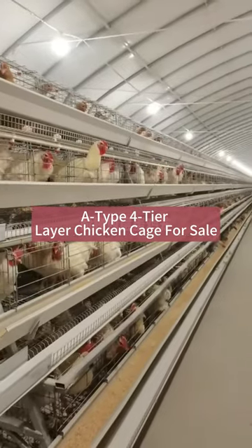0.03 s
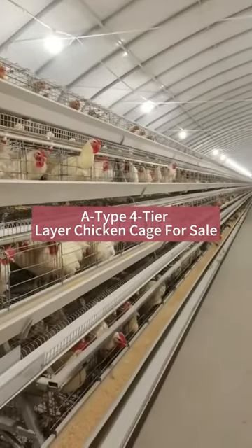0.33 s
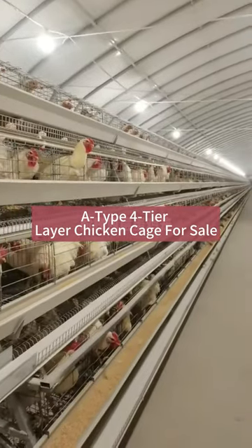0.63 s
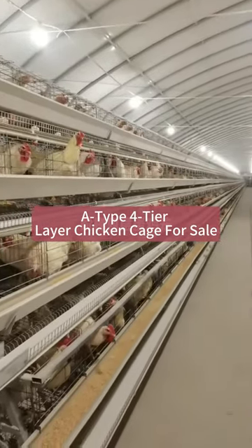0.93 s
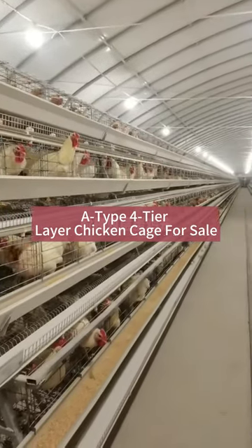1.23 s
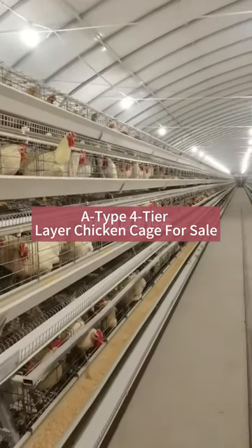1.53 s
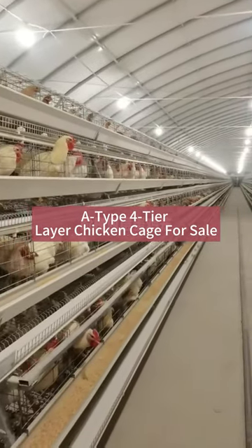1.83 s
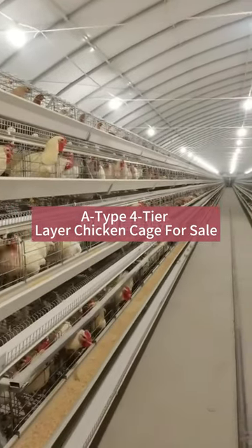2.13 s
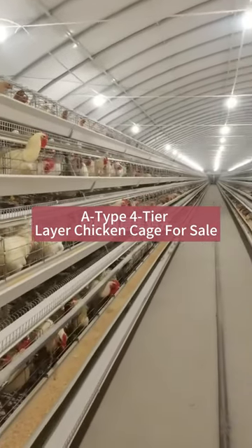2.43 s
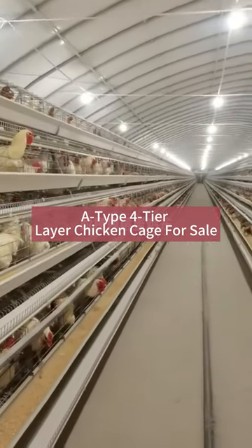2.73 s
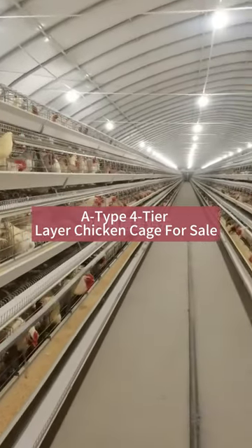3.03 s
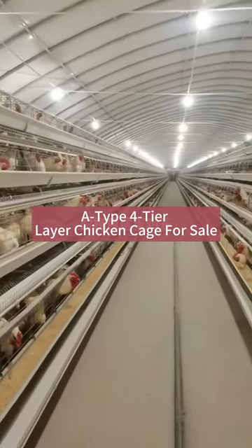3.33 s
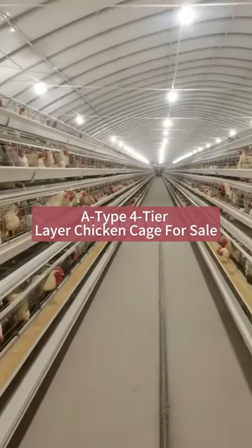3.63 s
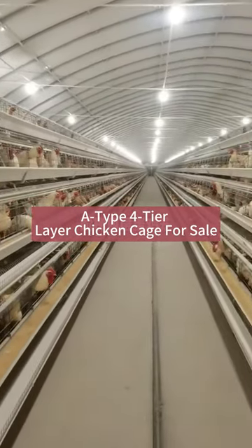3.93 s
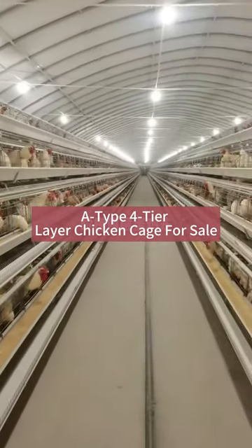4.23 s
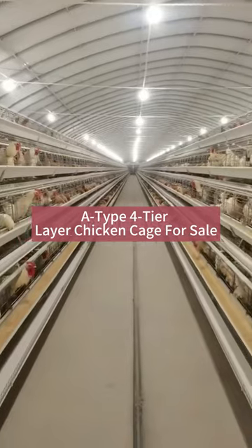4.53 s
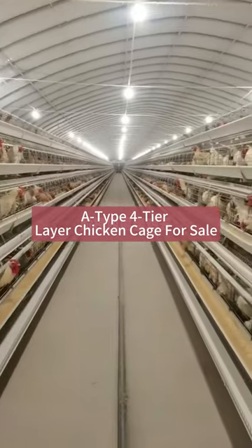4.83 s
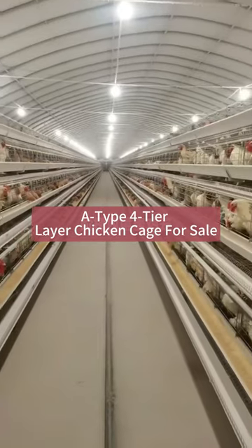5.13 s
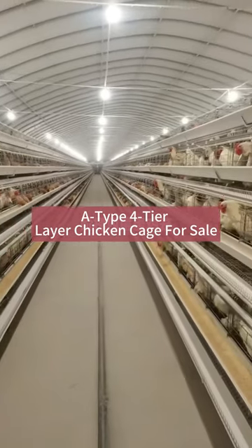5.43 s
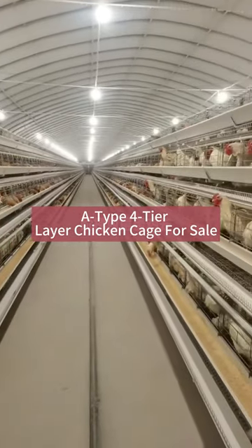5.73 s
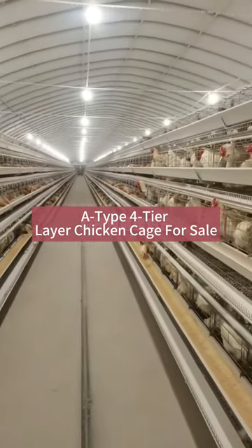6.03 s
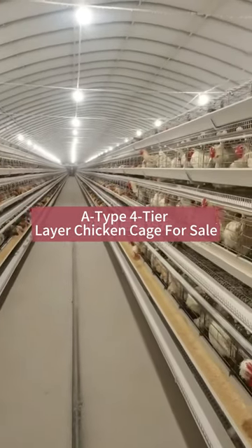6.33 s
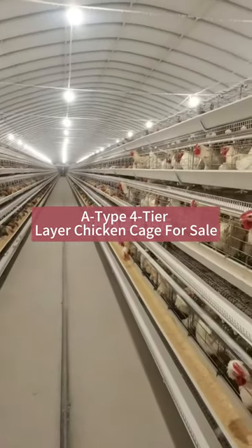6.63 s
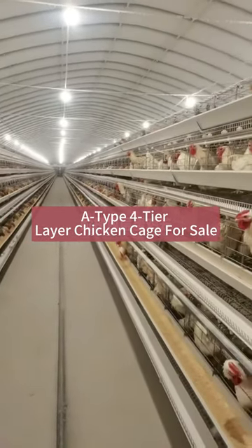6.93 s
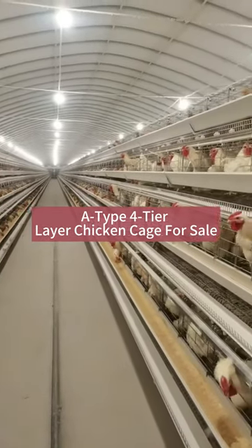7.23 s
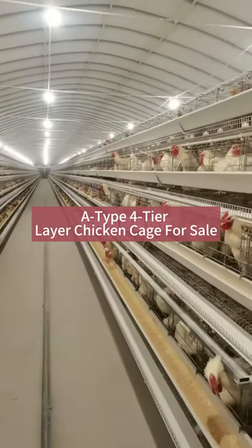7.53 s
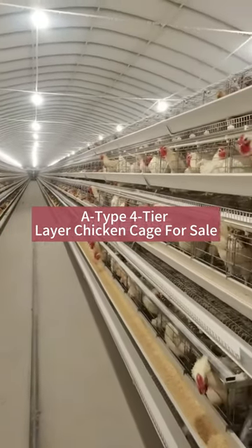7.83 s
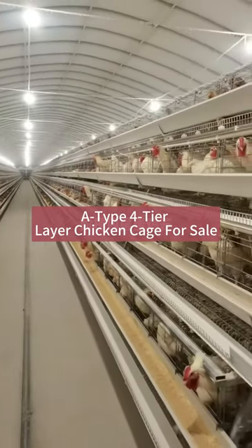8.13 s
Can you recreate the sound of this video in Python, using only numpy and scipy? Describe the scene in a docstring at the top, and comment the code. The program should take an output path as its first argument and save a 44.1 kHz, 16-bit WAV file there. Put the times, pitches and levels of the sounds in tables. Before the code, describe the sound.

Ventilation fans hum and rush in a large poultry house while hens cluck and peck faintly, with a brief dropout midway.

```python
"""Inside a long arched poultry house: big ventilation fans hum and push a steady rush of air down the aisle.
The hum is blade-passing tones and thin motor whines. Caged hens tap their beaks on wire and troughs,
and cluck, squawk and rasp under the roar: syrinx pulses and breath noise ring their throats,
blurred by the hall. The sound cuts out for just over half a second in the middle, then comes back."""
import sys
import numpy as np
from scipy import signal
from scipy.fft import rfft, irfft, next_fast_len
from scipy.io import wavfile
from scipy.ndimage import uniform_filter1d, map_coordinates

SR = 44100
rng = np.random.default_rng(int(sys.argv[2]) if len(sys.argv) > 2 else 0)


def int16_out(signal):
    """Quantize to a 16-bit WAV file."""
    q = np.round(np.clip(np.atleast_2d(signal).T, -1, 1) * 32767)
    wavfile.write(sys.argv[1], SR, q.astype(np.int16))


N = 369558


def amp(db):
    """Decibels to gain."""
    return 10 ** (np.asarray(db) / 20)


def unit(x):
    """Scale to rms 1."""
    return x / np.sqrt(np.mean(np.abs(x) ** 2) + 1e-20)


def over_frequency(rows, hz):
    """Interpolate (frequency [Hz], value) rows on a log axis."""
    row_hz, values = np.transpose(rows)
    return np.interp(np.log(hz + 1), np.log(row_hz + 1), values)


def over_time(rows):
    """Interpolate (time [s], value) rows to one value per sample."""
    return np.interp(np.arange(N) / SR, *np.transpose(rows))


def wobble(rate_hz, size=N):
    """Smooth random curve, rate_hz knots a second."""
    knots = rng.standard_normal(int(size * rate_hz / SR) + 4)
    return map_coordinates(knots, [np.arange(size) * rate_hz / SR])


def filtered(x, response):
    """Apply a frequency response by zero-padded FFT."""
    size = next_fast_len(len(x) + 8192)
    hz = np.fft.rfftfreq(size, 1 / SR)
    return irfft(rfft(x, size) * response(hz), size)[:len(x)]


def resonance(hz, centre_hz, width_hz):
    """Causal second-order band-pass response."""
    return 1j * hz * width_hz / (centre_hz ** 2 - hz ** 2 + 1j * hz * width_hz)


def add(track, start_s, sound):
    """Mix a sound into a track in place."""
    span = track[int(start_s * SR):][:len(sound)]
    span += sound[:len(span)]


def turbulence(spectrum, patchy_db):
    """Shaped noise of rms 1, with patches of random gain in time and frequency."""
    bins = signal.stft(rng.standard_normal(N), nperseg=512)[2]
    patches = uniform_filter1d(rng.standard_normal(bins.shape), size=5, axis=0)
    patches = uniform_filter1d(patches, size=12, axis=1)
    noise = signal.istft(bins * amp(patchy_db * unit(patches)), nperseg=512)[1][:N]
    return unit(filtered(noise, lambda hz: amp(over_frequency(spectrum, hz))))


# Fan roar: (frequency [Hz], relative density [dB])
ROAR_SPECTRUM = [(15, -10), (30, -10), (60, -11.5), (80, -2.5), (105, -4.5), (150, 1), (200, -1.5),
                 (280, -2), (340, -0.5), (430, -.5), (530, -3), (640, -8.5), (820, -16.5), (1300, -33.5),
                 (3000, -71.5)]
# Aisle hiss: (frequency [Hz], relative density [dB])
HISS_SPECTRUM = [(300, -25.5), (800, -4.5), (1200, 1), (1500, 0), (1850, -1), (2300, -5), (2900, -10.5),
                 (3800, -17), (5100, -17), (6300, -20), (7500, -27.5)]
# Hiss along the aisle: (time [s], level [dB])
HISS_LEVEL = [(0, -33), (3.6, -33), (5.2, -32), (6.4, -32.5), (7.1, -34), (8.38, -33.5)]


def airflow(roar_db=-26):
    """The fans' low roar, and the hiss of air and distant flock along the cages."""
    roar = amp(roar_db + 0.23 * wobble(4.8)) * turbulence(ROAR_SPECTRUM, patchy_db=1.0)
    hiss = amp(over_time(HISS_LEVEL) + 0.32 * wobble(12)) * turbulence(HISS_SPECTRUM, patchy_db=1.5)
    return roar + hiss


# Blade-rate harmonics 1, 2, 3 ...: (base level [dB], unsteadiness [0-1])
BLADE_HARMONICS = [(-49, 0.1), (-26.5, 0.06), (-31.5, 0.2), (-39, 0.96), (-38.5, 0.5), (-41.5, 0.99),
                   (-42, 0.4)]
# Swell of harmonic 2, the main drone, along the aisle: (time [s], gain [dB])
DRONE_SWELL = [(0, 0), (4.2, .3), (5.5, -.3), (6.4, 1.5), (7.1, .2), (8.38, 1)]
# Walk through standing waves, harmonic 5 traded against 4: (time [s], tilt [dB])
STANDING_WAVE_TILT = [(0, 4), (1.3, 4.5), (2.5, 2), (4.2, -5), (5.5, -2.5), (8.38, -0.5)]
# Motor whines: (frequency [Hz], base level [dB])
MOTOR_WHINES = [(634.4, -50.5), (3350, -68.5)]
# Late return of the hum after the cut-out: (time [s], gain [dB])
HUM_DIP = [(4.5, 0), (5.02, -8), (5.12, -5), (5.2, 0)]


def fan_hum(blade_hz=44.05):
    """Blade tones on one drifting shaft, each wavering with uneven inflow, plus motor whines."""
    t = np.arange(N) / SR
    blade_phase = 2 * np.pi * np.cumsum(blade_hz * (1 + .0012 * wobble(1.49))) / SR
    tilt_db = over_time(STANDING_WAVE_TILT)
    position_db = {2: over_time(DRONE_SWELL), 4: -tilt_db, 5: tilt_db}
    hum = np.zeros(N)
    for order, (db, unsteadiness) in enumerate(BLADE_HARMONICS, 1):
        waver = unit(1 + unsteadiness * (wobble(7) + 1j * wobble(7)) / np.sqrt(2))
        phase = order * blade_phase + 2 * np.pi * rng.random()
        hum += amp(db + position_db.get(order, 0)) * np.real(waver * np.exp(1j * phase))
    for hz, db in MOTOR_WHINES:
        hum += amp(db + 3.9 * wobble(3.7)) * np.sin(2 * np.pi * hz * t + wobble(6))
    return np.sqrt(2) * amp(over_time(HUM_DIP)) * hum


# Hall decay: (frequency [Hz], T60 [s])
HALL_T60 = [(200, 0.84), (1500, 0.47), (7000, 0.33)]


def hall_reverb(x):
    """The arched roof's reverberation, shorter in the treble."""
    hz, t, bins = signal.stft(rng.standard_normal(SR), SR, nperseg=256)
    decay = amp(-60 * t / over_frequency(HALL_T60, hz)[:, None])
    tail = signal.istft(bins * decay, SR, nperseg=256)[1]
    return signal.fftconvolve(x, tail / np.linalg.norm(tail))[:N]


# Beaks on cage wire and troughs: (time [s], level [dB], ring [Hz])
BEAK_TAPS = [(.44, -43.5, 4660), (0.864, -42, 3350), (1.915, -44.5, 4800), (2.075, -42.5, 4870),
             (2.345, -45.5, 4500), (2.855, -44.5, 4980), (3.13, -48, 5250)]


def pecks(t60_s=0.13, width_hz=600):
    """Each peck sets a short, noisy rattle ringing in the cage."""
    track = np.zeros(N)
    t = np.arange(SR // 8) / SR
    for start_s, db, ring_hz in BEAK_TAPS:
        rattle = unit(filtered(rng.standard_normal(len(t)), lambda hz: resonance(hz, ring_hz, width_hz)))
        add(track, start_s, amp(db - 60 * t / t60_s) * rattle)
    return track


def syrinx(pitch_hz, roughness):
    """Jittery pulses plus noise gated once a cycle; roughness is the noise's share of the power."""
    size = len(pitch_hz)
    cycles = np.cumsum(pitch_hz * (1 + .015 * wobble(120, size))) / SR
    pulses = np.diff(np.floor(cycles), prepend=0)
    rasp = rng.standard_normal(size) * (1 + np.cos(2 * np.pi * cycles))
    return np.sqrt(1 - roughness) * unit(pulses - pulses.mean()) + np.sqrt(roughness) * unit(rasp)


THROAT_HARMONIC, WAVER_OCT, CALL_EDGE_S = 3, .017, .007


def hen_call(length_s, pitch_hz, db, upper_hz, upper_db, upper_width_hz, roughness, width_hz, glide_oct=0):
    """The syrinx rings two throat resonances, which glide and waver with the pitch."""
    size = int(length_s * SR)
    progress = np.linspace(0, 1, size)
    voice = syrinx(np.full(2 * size, pitch_hz), roughness)

    def formant(centre_hz, band_hz):
        return unit(filtered(voice, lambda hz: resonance(hz, centre_hz, band_hz) ** 2))

    throat = amp(db) * formant(THROAT_HARMONIC * pitch_hz, width_hz)
    upper = amp(upper_db) * formant(upper_hz, upper_width_hz)
    speed = 2 ** (glide_oct * (progress - .5) + WAVER_OCT * wobble(35, size))
    call = map_coordinates(throat + upper, [np.cumsum(speed)])
    gate = signal.windows.tukey(size, 2 * CALL_EDGE_S / length_s)
    breath_db = 2.2 * wobble(70, size) - 1.2 * progress  # flutters, fades as the air runs out
    return call * unit(gate * amp(breath_db))


def calm_call(length_s, pitch_hz, db, roughness, width_hz=380, glide_oct=0):
    """A cluck or drawn-out note: a weak upper resonance lies an octave above the throat's."""
    return hen_call(length_s, pitch_hz, db,
                    upper_hz=2 * THROAT_HARMONIC * pitch_hz, upper_db=db - 21.5, upper_width_hz=310,
                    roughness=roughness, width_hz=width_hz, glide_oct=glide_oct)


def far_hens(count=45):
    """Faint falling clucks at random times and pitches."""
    track = np.zeros(N)
    for when, height, nearness in rng.random((count, 3)):
        cluck = calm_call(length_s=.042, pitch_hz=367 + 317 * height, db=-47 + 6 * nearness,
                          roughness=0.35, glide_oct=-.2)
        add(track, when * N / SR, cluck)
    return track


# Wide-open throat: (centre [Hz], width [Hz], relative gain [dB])
CRY_FORMANTS = [(1196, 390, 9), (2070, 380, 4), (2880, 670, -4), (4300, 900, -18), (5980, 2100, -27)]


def hoarse_cry(start_s=5.8, pitch_hz=412, base_db=-34.5, sag_db_per_s=4.5):
    """One long rasp through a wide-open throat, weakening as the hen's air runs out."""
    def throat(hz):
        return sum((-1) ** k * amp(db) * resonance(hz, centre_hz, width_hz)
                   for k, (centre_hz, width_hz, db) in enumerate(CRY_FORMANTS))

    t = np.arange(N) / SR - start_s
    attack_s, hold_s, release_s = .13, .74, .19
    breath = np.interp(t, np.cumsum([0, attack_s, hold_s, release_s]), [0, 1, 1, 0])
    voice = syrinx(pitch_hz * (1 + .02 * wobble(8)), roughness=0.94)
    return amp(base_db - sag_db_per_s * t) * breath * unit(filtered(voice, throat))


# Clucks: (time [s], length [s], pitch [Hz], level [dB], glide [oct])
NEAR_CLUCKS = [ (0.56, .04, 613, -35.5, .3), (1.159, .05, 575, -35.5, -.15), (1.298, .04, 445, -32, -0.22),
               (1.452, .035, 376, -36.5, -0.23), (1.738, 0.026, 392, -38, -.1),
               (1.826, .033, 645, -40, -0.12), (1.979, .033, 760, -39, .1), (2.013, .052, 615, -35, -.02),
               (2.165, .04, 625, -34, -0.31), (2.198, 0.028, 398, -34.5, -0.068),
               (2.453, 0.058, 410, -37, -0.013), (3.794, .07, 492, -34.5, 0.044),
               (5.288, .028, 635, -39, 0.037), (5.467, .036, 635, -36.5, -0.21), (5.582, .03, 452, -35, 0),
               (5.598, 0.04, 640, -35.5, -0.021), (5.713, 0.032, 655, -35.5, -0.13),
               (5.826, .07, 582, -33.5, 0.015), (5.956, .05, 680, -35.5, -.2),
               (6.17, 0.037, 650, -34.5, -.2), (6.486, .06, 545, -33.5, .08), (7.062, .026, 450, -36, -.15),
               (7.247, .028, 437, -35.5, -0.047), (7.333, .05, 478, -34.5, -0.3),
               (7.438, 0.024, 413, -33, 0.1), (7.51, 0.027, 393, -35.5, 0.052),
               (7.683, .022, 440, -31, 0.29), (7.78, .028, 520, -35.5, .1),
               (8.128, 0.041, 580, -34.5, 0.023), ]
# Drawn-out notes: (time [s], length [s], pitch [Hz], level [dB], throat width [Hz])
NEAR_DRAWLS = [(3.824, .37, 634, -35.5, 401), (5.99, .46, 411.5, -36, 221)]
# Squawks: (time [s], length [s], pitch [Hz], level [dB],
#           upper resonance [Hz], upper level [dB], upper width [Hz])
NEAR_SQUAWKS = [ (2.68, 0.071, 973, -45.5, 3550, -47, 450), (3.461, .067, 571, -39, 3150, -46.5, 650),
                (4.226, .082, 593.4, -31, 3520, -41, 290), (4.356, .042, 598, -27, 3320, -47.5, 500),
                (5.161, 0.086, 481, -42.5, 2900, -40.5, 600), (6.458, .04, 458, -34.5, 4000, -47.5, 400), ]


def near_hens():
    """Short clucks, breathy drawn-out notes and shrill squawks from the nearby cages."""
    track = np.zeros(N)
    for start_s, length_s, pitch_hz, db, glide_oct in NEAR_CLUCKS:
        add(track, start_s, calm_call(length_s, pitch_hz, db, roughness=.45, glide_oct=glide_oct))
    for start_s, length_s, pitch_hz, db, width_hz in NEAR_DRAWLS:
        add(track, start_s, calm_call(length_s, pitch_hz, db, roughness=.92, width_hz=width_hz))
    for start_s, *squawk in NEAR_SQUAWKS:
        add(track, start_s, hen_call(*squawk, roughness=.8, width_hz=490))
    return track


def scene():
    """Fan hum and airflow over the hens and their reverberation, in mono."""
    hens = hoarse_cry() + near_hens() + far_hens() + pecks()
    hens_in_hall = hens + amp(-6.5) * hall_reverb(hens)
    return (fan_hum() + airflow() + hens_in_hall)[None]


# Cut-out of the whole sound: (time [s], gain [dB])
CUT_OUT = [(4.417, 0), (4.421, -40), (4.43, -100), (5.016, -100), (5.017, -1), (5.1, -.5), (5.18, 0)]


def record(dry):
    """The sound cuts out briefly and is steeply low-passed."""
    cutoff_hz, edge_hz = 7650, 120
    gated = dry[0] * amp(over_time(CUT_OUT))
    return filtered(gated, lambda hz: np.clip((cutoff_hz - hz) / edge_hz + .5, 0, 1))[None]


dry = scene()
out = record(dry)
int16_out(out)
```